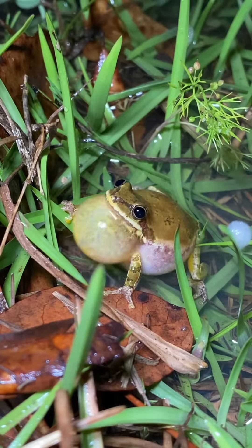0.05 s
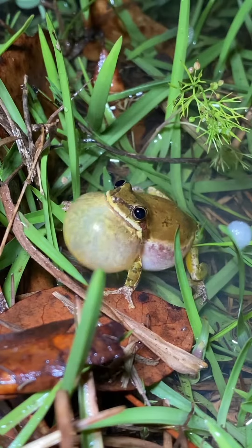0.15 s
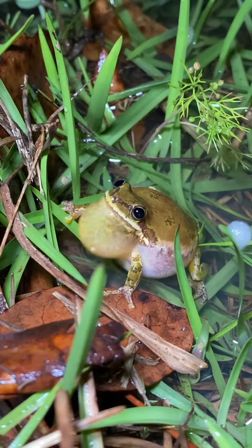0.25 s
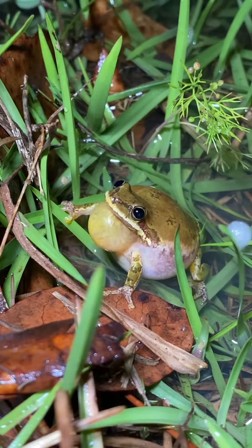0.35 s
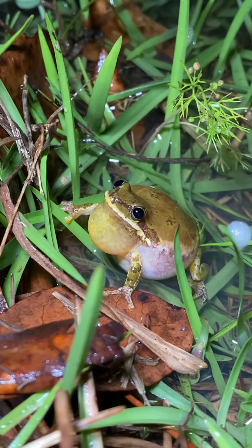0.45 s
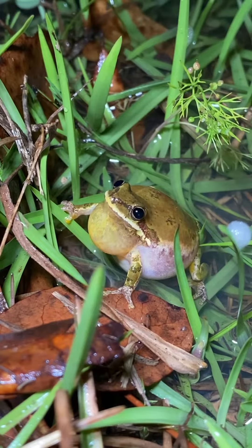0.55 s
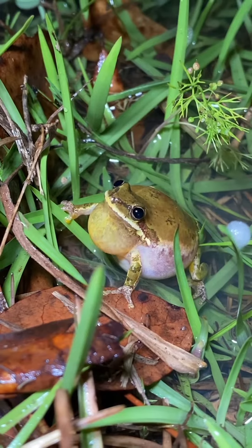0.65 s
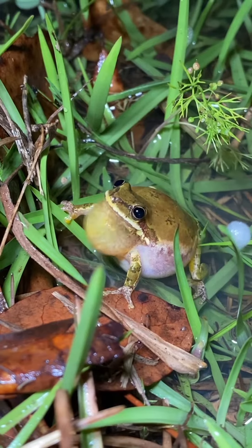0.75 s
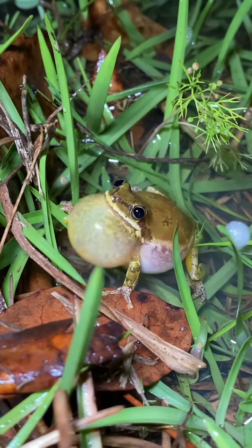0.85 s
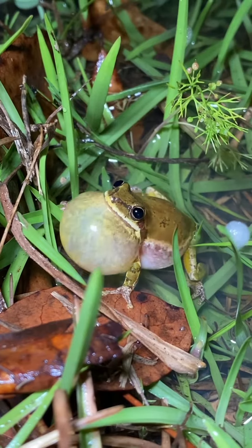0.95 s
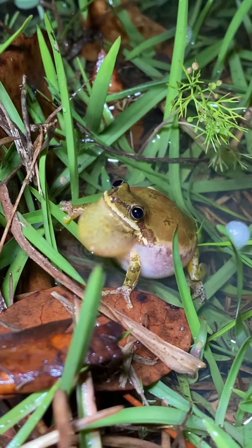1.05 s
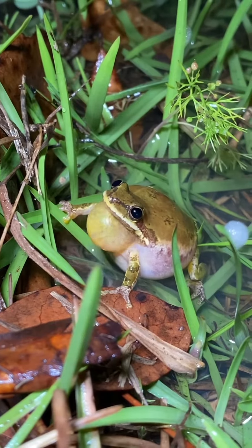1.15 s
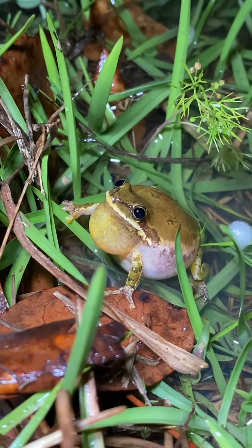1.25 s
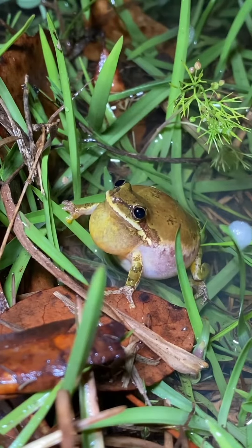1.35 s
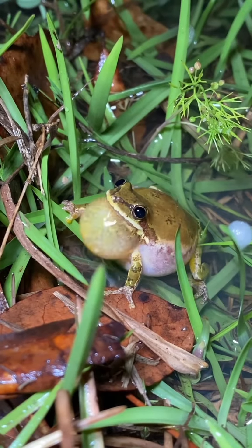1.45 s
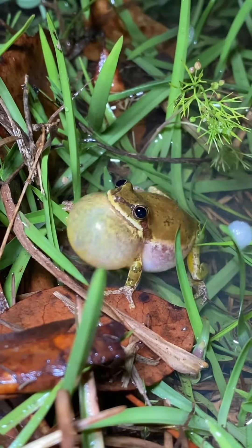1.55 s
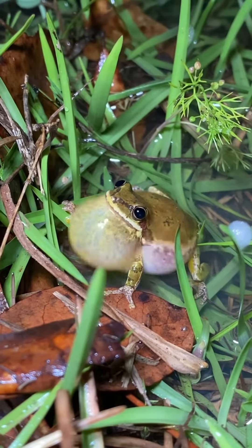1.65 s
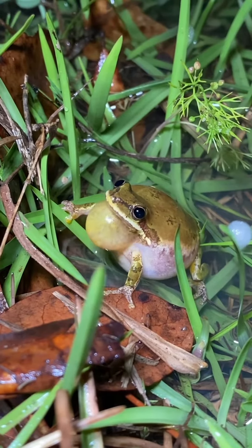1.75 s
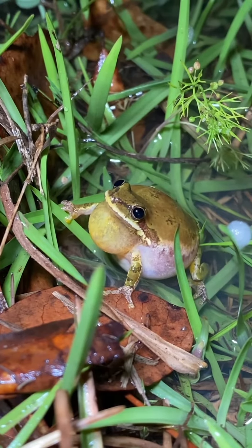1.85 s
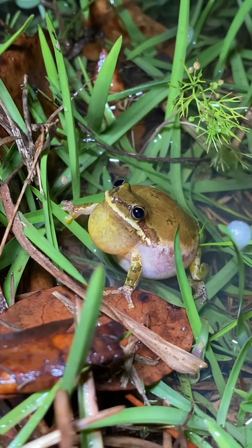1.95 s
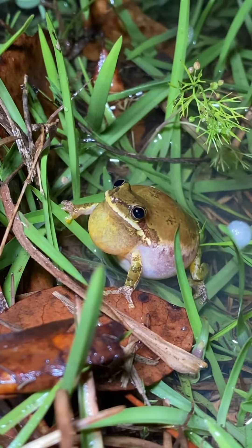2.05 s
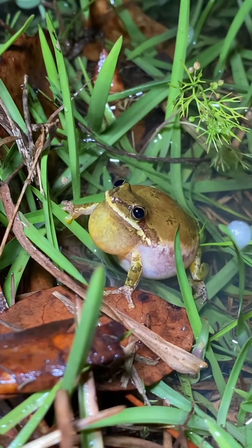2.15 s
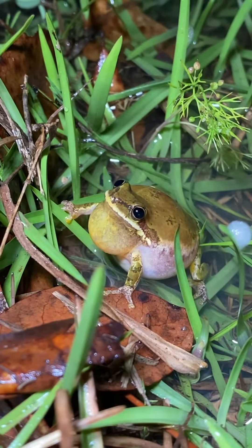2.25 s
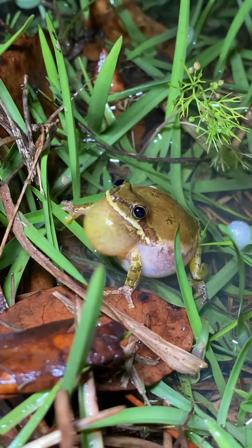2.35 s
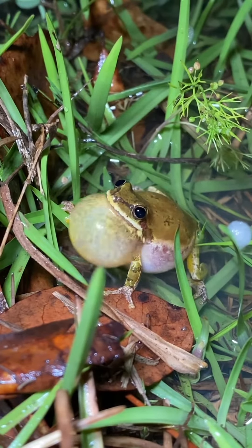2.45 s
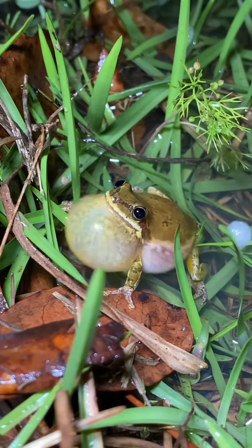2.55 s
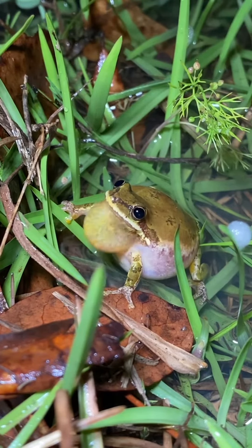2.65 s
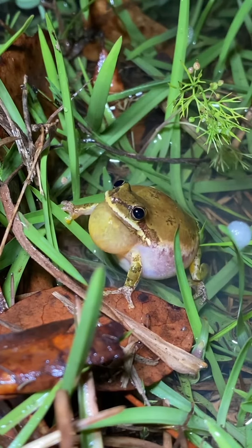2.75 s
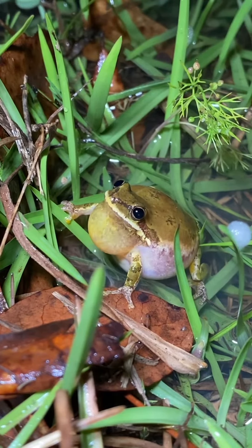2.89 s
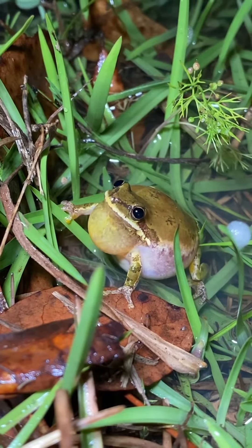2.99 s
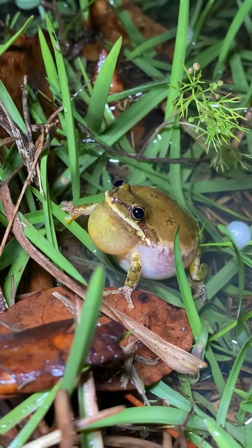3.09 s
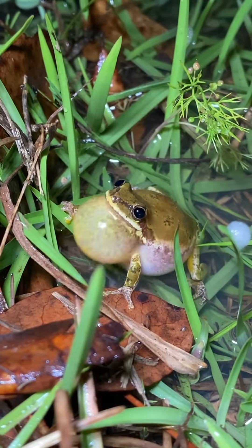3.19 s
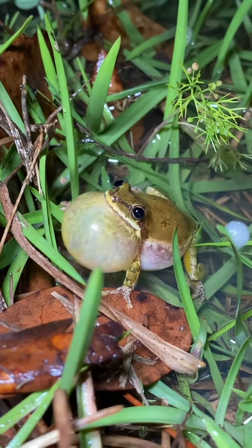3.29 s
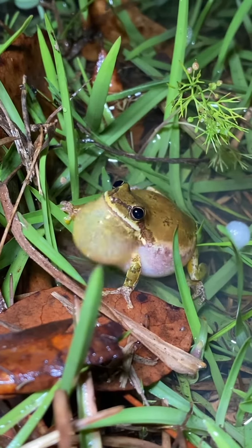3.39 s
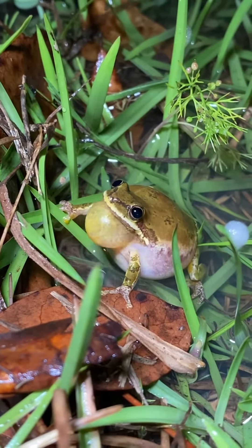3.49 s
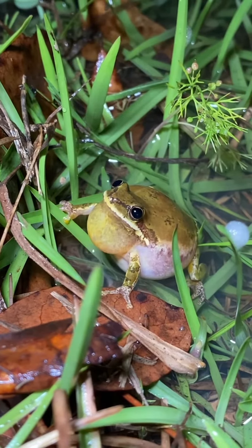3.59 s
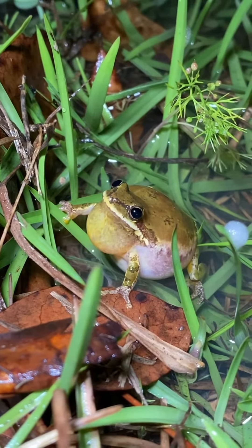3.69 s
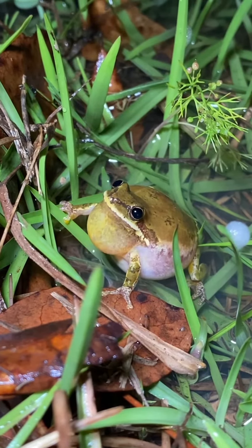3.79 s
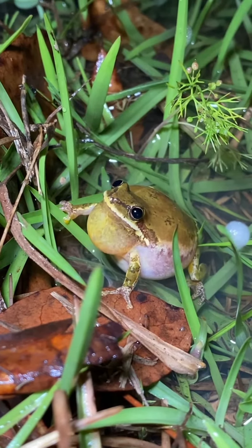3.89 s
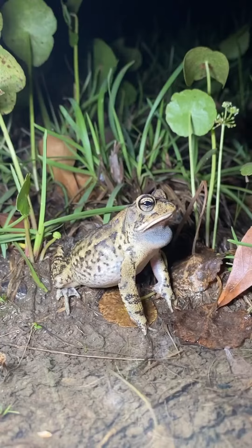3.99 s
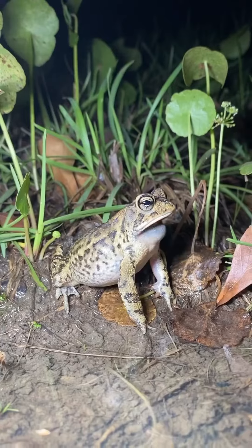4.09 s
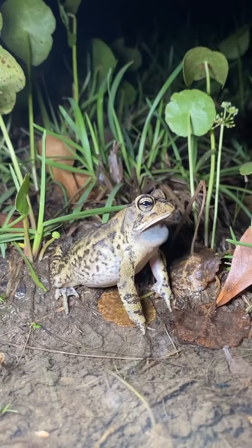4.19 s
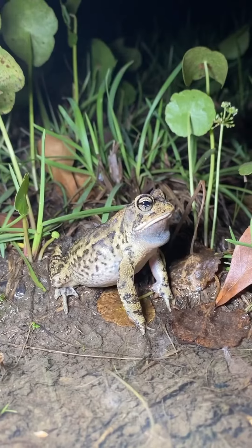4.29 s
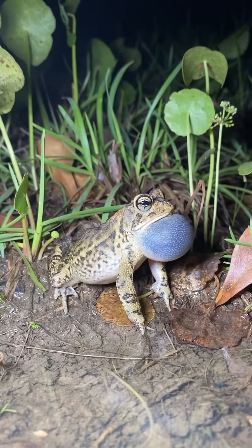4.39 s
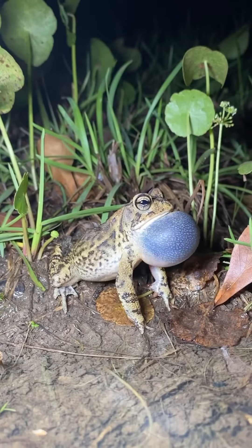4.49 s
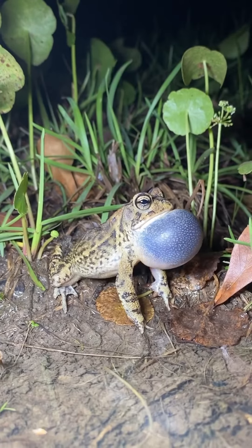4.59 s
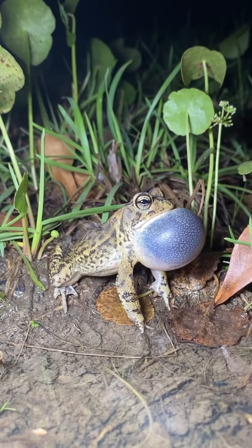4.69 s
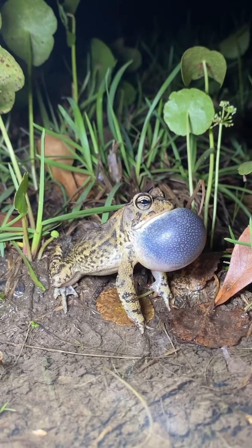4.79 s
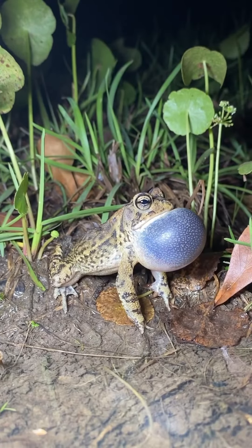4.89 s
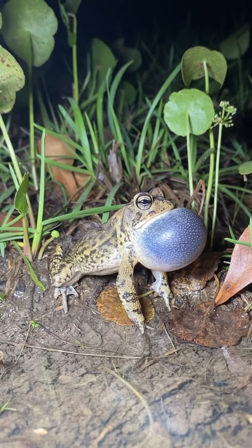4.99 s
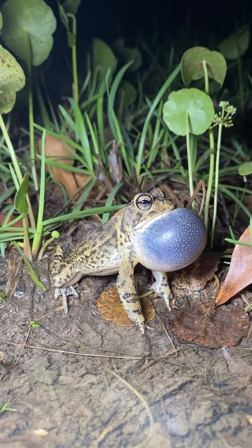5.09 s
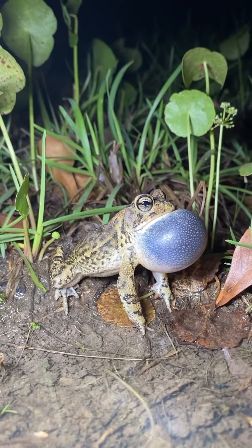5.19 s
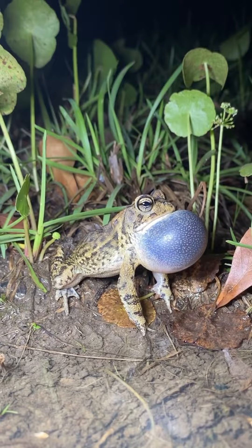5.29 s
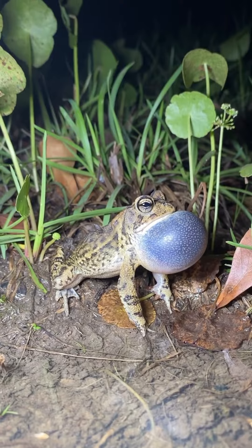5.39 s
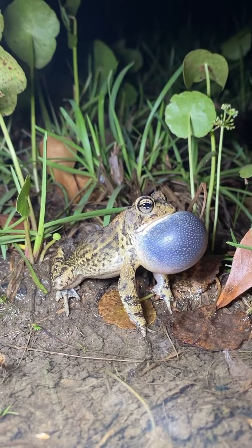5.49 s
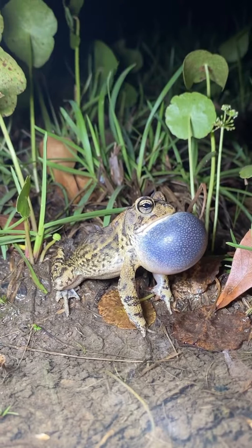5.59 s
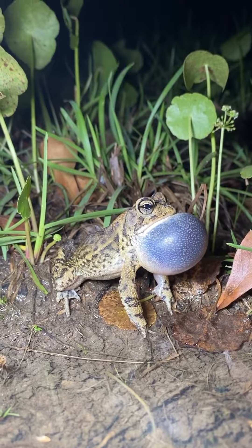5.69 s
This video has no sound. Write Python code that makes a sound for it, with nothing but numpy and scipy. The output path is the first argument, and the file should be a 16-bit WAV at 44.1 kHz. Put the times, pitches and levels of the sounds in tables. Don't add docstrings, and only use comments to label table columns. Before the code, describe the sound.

At a pond at night, a close tree frog gives brief grating croaks slightly under a second apart, over a pulsing chorus of distant frogs, a faint cricket and low hum. A knock marks a jump early on. Near four seconds another knock cuts to a much quieter bank, where a toad swells into a fast, clear trill until a final knock. Close stereo handheld microphone outdoors.

```python
import sys
import numpy as np
from scipy import signal
from scipy.fft import rfft, irfft, next_fast_len
from scipy.io import wavfile
from scipy.ndimage import uniform_filter1d

SR = 44100
rng = np.random.default_rng(int(sys.argv[2]) if len(sys.argv) > 2 else 0)


def store_wav(level_fs):
    pcm = np.round(np.clip(np.atleast_2d(level_fs), -1, 1) * 32767)
    wavfile.write(sys.argv[1], SR, pcm.T.astype(np.int16))


def voltage_ratio(decibels):
    exponent = np.asarray(decibels, float) / 20
    return 10 ** exponent


N = 253134
CUT_S = 3.976

# (slack [Hz], swollen [Hz], slack width [Hz], swollen width [Hz],
# slack level [dB], swollen level [dB])
THROAT_MODES = [(1046.9, 1125.8, 55, 220, -1.5, -3.5), (1415, 1550, 520, 480, -14, -9),
                (1723, 2204, 1400, 500, -7.5, -3.5), (2320, 3010.3, 500, 420, -6.5, 7),
                (3250, 3274, 1100, 500, -10.5, -11.5), (4533, 4600, 450, 500, -16.5, -25),
                (7100, 7100, 300, 300, -30, -25), (8860, 9300, 180, 230, -43.5, -31),
                (11100, 12000, 180, 170, -51, -43), (15300, 15300, 250, 250, -58.5, -47)]
MODE_LAG_MS = [0.62, 0.0185, -0.87, -0.0522, 0.462, -.1, -0.075, 0.6, -0.053, 0.83]
MODE_FLUTTER = [.05, .15, .15, .1, .2, .6, 1.5, 1.6, 2.4, 2.4]
# (start [s], pulses [count], gap before one late stray pulse [s])
FROG_CALLS = [
    (1.3555, 17, .028),
    (2.2848, 16, .0252),
    (3.0612, 17, .0139),
    (3.9142, 5, .1),
]
STRAY_DB = [-14, -28.5, -18, -50]
# (multiple of its pitch [ratio], level [dB])
STRAY_PARTIALS = [(1, -1.5), (1.95, -3), (3.05, -3)]


def frog():
    opening_gap_s, steady_gap_s, closing_gap_s = .0105, .00987, .0112
    full_effort_db, start_db, attack_s = -2, -10.5, 0.00951
    tire_db_per_s, tire_from_s = -39.5, 0.033
    swell_from_s, swell_s = 0.013, 0.077
    soft_tilt = 0.17
    stray_hz, stray_width_hz, stray_rise_s = 1012.7, 200, .009
    rise_s = .0038
    out, t = np.zeros((2, N)), np.arange(760) / SR
    end = np.cos(np.pi / 2 * t / t[-1]) ** .5
    modes = np.array(THROAT_MODES)
    slack, swollen = modes[:, ::2], modes[:, 1::2]
    for (start, pulses, stray_gap), stray_db in zip(FROG_CALLS, STRAY_DB):
        steady = [steady_gap_s] * max(pulses - 4, 2)
        since = np.cumsum([0, opening_gap_s, opening_gap_s] + steady + [closing_gap_s])
        effort_db = full_effort_db + start_db * np.exp(-(since / attack_s) ** 2)
        effort_db += tire_db_per_s * np.maximum(since - tire_from_s, 0)
        blip = 0
        for multiple, db in STRAY_PARTIALS:
            partial = ring(t, multiple * stray_hz, stray_width_hz, stray_rise_s, .15)
            blip = blip + voltage_ratio(stray_db + db) * partial
        add(out, start + since[-1] + stray_gap - stray_rise_s, end * blip)
        swelling = 1 - np.exp(-np.maximum(since - swell_from_s, 0) / swell_s)
        since += .00015 * rng.standard_normal(len(since))
        for at, effort, full in zip(start + since, effort_db, swelling):
            now = slack + full * (swollen - slack)
            duller = soft_tilt * (effort - full_effort_db)
            chance = rng.standard_normal((len(now), 2))
            for (hz, width, db), lag_ms, depth, (a, b) in zip(now, MODE_LAG_MS, MODE_FLUTTER, chance):
                level = voltage_ratio(effort + db + duller * np.log2(hz / 1000) + 0.23 * b - 4.0)
                mode = ring(t, hz * (1 + .01 * a), width, rise_s + lag_ms / 1000, depth)
                add(out, at - rise_s, level * end * mode)
    return out


# (multiple of the whistle [ratio], level [dB], flutter depth [ratio])
TOAD_OVERTONES = [(2, -37.5, 0.2), (2.85, -49, 1), (3.8, -43.5, 0.86), (4.6, -60.5, 0.79), (5.1, -55.5, .6),
                  (7.3, -65, 2)]
# (bend of the pitch arch [ratio], time to peak [ms], sharpness of close [-])
SLACK_PULSE = (2.3, 1.1, 0.524)
TAUT_PULSE = (1.108, 3.987, 2.061)


def toad():
    start_s, gap_s, stretch_s = 4.4232, .015744, 2.479e-5
    extra_gap_s, settle_pulses = .001886, 5.51
    out, t, k = np.zeros((2, N)), np.arange(1, 640) / SR, np.arange(79)
    times = gap_s * k + stretch_s * k ** 2 / 2
    times += extra_gap_s * settle_pulses * (1 - np.exp(-k / settle_pulses))
    end = np.cos(np.pi / 2 * (t / t[-1]) ** 3)
    opening = np.sin(np.clip(t / .0022, 0, 1) * np.pi / 2) ** 2
    for since, (a, b, c) in zip(times, rng.standard_normal((len(times), 3))):
        db = 1 - 19.5 * np.exp(-since / 0.0925) - 3.5 * max(since - 0.624, 0)
        hz = 2028.9 - 408 * np.exp(-since / 0.0989) - 150 * np.exp(-since / .02) + 54 * since
        taut = 1 / (1 + np.exp((0.11 - since) / 0.012))
        slack = 1 - taut
        bend, peak_ms, close = slack * np.array(SLACK_PULSE) + taut * np.array(TAUT_PULSE)
        u = t * 1000 / peak_ms
        shape = opening * np.exp(1.24 * (np.log(u) + (1 - u ** close) / close))
        settled = 1 - np.exp(-since / .5)
        arch = bend * (1 - 0.393 * settled) * ((t - .003) / .016) ** 2
        sag = np.minimum(arch + 12 * settled * (t - .004), .45)
        pitch = hz * (1 + .003 * a)
        phase = 2 * np.pi * np.cumsum(pitch * (1 - sag)) / SR
        overtones = 0
        for multiple, level_db, depth in TOAD_OVERTONES:
            unsteady = 1 + depth * smooth_noise(len(t), 70)
            lift_db = 10 * slack * (multiple < 2.5)
            overtones = overtones + voltage_ratio(level_db + lift_db) * unsteady * np.sin(multiple * phase)
        overtones *= np.sqrt(shape)
        air = smooth_noise(len(t), 50) * np.cos(.65 * phase)
        rattle = smooth_noise(len(t), 14)
        puff = voltage_ratio(-30.5) * air + (voltage_ratio(-34.5) + voltage_ratio(-21) * slack) * rattle
        tail = (0.32 + 0.8 * taut) * voltage_ratio(-26 + 5.7 * c) * ring(t, hz * 1.02, 48, 0.0061)
        whistle = shape * (np.sin(phase) + puff) + overtones + tail
        add(out, start_s + since - .001 + .0001 * c, voltage_ratio(db + .3 * b) * whistle * end)
    return out


# (start [s], end [s], mode at start [Hz], mode at end [Hz], level [dB])
NEIGHBOUR_CALLS = [(1.253, 1.4, 2917, 3200, -17), (1.54, 1.737, 2784, 2750, -20),
                   (1.639, 1.801, 3250, 3300, -24), (1.83, 1.992, 2886, 3150, -18.5),
                   (1.973, 2.132, 3146, 3300, -20), (2.116, 2.229, 2790, 3200, -30),
                   (2.243, 2.365, 2675, 2720, -20), (2.467, 2.618, 2839, 3189, -21),
                   (2.648, 2.773, 2911, 3300, -20.5), (2.693, 2.884, 3271, 3400, -22),
                   (3.227, 3.272, 2589, 3000, -22), (3.356, 3.497, 3230, 3311, -22.5),
                   (3.42, 3.628, 2714, 3100, -21), (3.591, 3.741, 3510, 3420, -28.5),
                   (3.746, 3.892, 2870, 3100, -32), (3.858, 3.945, 3005, 3300, -24.5),
                   (4.162, 4.335, 3250, 3400, -41), (4.357, 4.437, 2770, 2750, -44),
                   (3.996, 4.132, 3440, 3365, -60.5), (4.142, 4.334, 2587, 2650, -52.5)]
# (frequency [Hz], width [Hz], level [dB], flutter depth [ratio])
NEIGHBOUR_MODES = [(1269, 150, -15.5, 0.44), (1838, 440, -14.5, 0.22), (4361.6, 580, -18.5, 0.86)]
# (frequency [Hz], width [Hz], level [dB], flutter depth [ratio])
NEIGHBOUR_TOP = (10188, 176, -42, 7)


def neighbours():
    out, t = np.zeros((2, N)), np.arange(500) / SR
    top_hz, top_width, top_db, top_depth = NEIGHBOUR_TOP
    for start, end, hz0, hz1, db in NEIGHBOUR_CALLS:
        chance = rng.standard_normal((40, 8))
        gap_s = .0098 * (1 + .015 * chance[-1, 0])
        pan_db = 1.8 * chance[-1, 1]
        top = (top_hz, top_width, top_db + 0.027 * (hz0 - 3200), top_depth)
        for at, draw in zip(np.arange(start, end, gap_s), chance):
            along = (at - start) / (end - start)
            main = (hz0 + (hz1 - hz0) * along, 200, 0, .25)
            pulse = 0
            for (hz, width, mode_db, depth), r in zip([main, top] + NEIGHBOUR_MODES, draw):
                mode = ring(t, hz * (1 + 0.0025 * r), width, .0036, depth)
                pulse = pulse + voltage_ratio(mode_db + 0.4 * r) * mode
            call_db = db - 8.2 * (1 - along) ** 4 - 5.2 * along ** 6
            add(out, at - .0016 + .0002 * draw[-1], voltage_ratio(call_db) * pulse, pan_db)
    return out


def cricket():
    start_s, stroke_period_s = 1.2755, .02606
    out, t = np.zeros((2, N)), np.arange(640) / SR
    times = np.arange(start_s, CUT_S, stroke_period_s)
    shape = np.sin(np.pi * (t / t[-1]) ** 0.93) ** 1.5
    for at, (a, b) in zip(times, rng.standard_normal((len(times), 2))):
        hz = 5920 * (1 + 0.0027 * a) - 700 * (t / t[-1]) ** 2.7
        chirp = shape * np.sin(2 * np.pi * np.cumsum(hz) / SR)
        add(out, at, voltage_ratio(-40.0 + 0.74 * b) * chirp, .5)
    return out


# (time [s], level [dB], frequency [Hz], decay [ms], tick level [dB])
CLICKS = [
    (1.2676, -8.5, 984, 1.61, -36),
    (1.2716, -41, 995, 1.73, -34),
    (3.9524, -16.5, 1560, 0.54, -16),
    (4.278, -52, 712, 3, -76.5),
    (5.7393, -17, 2000, 0.63, -20),
]


def clicks():
    out, t = np.zeros((2, N)), np.arange(800) / SR
    for at, db, hz, decay_ms, tick_db in CLICKS:
        damped = voltage_ratio(db) * np.exp(-t * 1000 / decay_ms) * np.cos(2 * np.pi * hz * t)
        tick = voltage_ratio(tick_db) * np.exp(-t / 0.000091) * rng.standard_normal(len(t))
        add(out, at, damped + tick)
    return out


# (frequency [Hz], level per Hz [dB])
POND_SPECTRUM = [(20, -42), (40, -25.5), (75, -8.5), (110, -20), (200, -30), (500, -33.5), (850, -27.5),
                 (1180, -4.5), (1700, -30.5), (2900, -5), (3400, -9), (4000, -29), (6000, -21.5),
                 (7200, -53), (9500, -34.5), (12000, -74.5)]


def pond_murmur():
    return wash(POND_SPECTRUM, -42.5 + 5.5, 0.73)


# (frequency [Hz], level per Hz [dB])
BANK_SPECTRUM = [(20, -30.5), (60, -16.5), (160, -19), (250, -29), (800, -45.5), (1250, -21), (1900, -42.5),
                 (2500, -27), (3400, -22), (4200, -46.5), (8000, -78)]


def bank_murmur():
    return wash(BANK_SPECTRUM, -65 + 7.0, 1.6)


# (frequency [Hz], level [dB])
MACHINERY = [(118.4, -76.5), (177.6, -74)]


def machinery():
    t = np.arange(N) / SR
    return sum(voltage_ratio(db + 5) * np.sin(2 * np.pi * hz * t) for hz, db in MACHINERY)


# (frequency [Hz], left-right correlation [-1 to 1])
DIFFUSE_LIKENESS = [(50, 1), (200, 0.862), (500, 0.45), (1200, 0.28), (3000, 0.95), (9000, 0.51)]


def wash(spectrum, db, patchy_db):
    hz = np.fft.rfftfreq(1024, 1 / SR)
    a, b, c, d, patches = rng.standard_normal((N // 256 + 5, 513, 5)).T
    patches = evened(uniform_filter1d(uniform_filter1d(patches, 8, 0), 14, 1))
    same = np.clip(read(DIFFUSE_LIKENESS, hz), -1, 1)[:, None]
    left = a + 1j * b
    right = same * left + np.sqrt(1 - same ** 2) * (c + 1j * d)
    z = np.array([left, right]) * voltage_ratio(read(spectrum, hz)[:, None] + patchy_db * patches)
    return voltage_ratio(db) * evened(signal.istft(z, nperseg=1024, noverlap=768)[1][:, :N])


def echoes(x, db, t60):
    t = np.arange(6000) / SR
    tail = rng.standard_normal((2, len(t))) * voltage_ratio(-60 * t / t60) * (t > .002)
    tail /= np.linalg.norm(tail[0])
    return x + voltage_ratio(db) * signal.fftconvolve(x, tail, axes=1)[:, :N]


def ducking(x, knee_db, share, db_per_s):
    power_db = 10 * np.log10(abs(uniform_filter1d((x ** 2).mean(0), 900)) + 1e-12)
    fall_db = np.arange(N) * db_per_s / SR
    held_db = np.maximum.accumulate(power_db + fall_db) - fall_db
    over_db = np.maximum(held_db - knee_db, 0)
    return voltage_ratio(-share * uniform_filter1d(over_db, 400))


def ports(x, phase, lean):
    size = next_fast_len(N)
    hz = np.fft.rfftfreq(size, 1 / SR)
    half = voltage_ratio(read(lean, hz) / 2) * np.exp(.5j * read(phase, hz))
    return irfft(rfft(x, size) * np.array([half, 1 / half]), size)[:, :N]


def coloured(x, points):
    size = next_fast_len(N)
    gain = voltage_ratio(read(points, np.fft.rfftfreq(size, 1 / SR)))
    return irfft(rfft(x, size) * gain, size)[:, :N]


def ring(t, hz, width, rise, depth=0.):
    swell = np.sin(np.clip(t / rise, 0, 1) * np.pi / 2) ** 4.664
    decay = np.exp(-np.pi * width * np.maximum(t - rise, 0))
    flutter = 1 + depth * smooth_noise(len(t), 60)
    return swell * decay * flutter * np.cos(2 * np.pi * hz * (t - rise))


def smooth_noise(length, span):
    return evened(np.convolve(rng.standard_normal(length), np.hanning(span), "same"))


def evened(x):
    return x / np.sqrt(np.mean(x ** 2) + 1e-20)


def read(points, hz):
    f, value = np.transpose(points)
    return np.interp(np.log(hz + 1), np.log(f + 1), value)


def add(mix, at_s, sound, pan_db=0.):
    part = mix[:, round(at_s * SR):][:, :len(sound)]
    part += sound[:part.shape[1]] * voltage_ratio([[pan_db / 2], [-pan_db / 2]])


# (frequency [Hz], left minus right [dB])
FROG_PHASE = [(0, 0), (690, -0.1), (1380, 0.1), (1640, -0.3), (2500, 0.8), (3100, 0.3)]
FROG_LEAN = [(100, 0), (550, -3), (960, -3), (1680, 1), (2920, 0.5)]
# (frequency [Hz], left minus right [dB])
TOAD_PHASE = [(0, 0), (1460, 0.42), (2070, -0.656), (2580, -0.78), (2840, 0.49), (3100, -1.6)]
TOAD_LEAN = [(60, 0.0), (130, 0.0), (280, 0.0), (620, 0.0), (1340, 0.745), (2920, -0.5)]
TRILL_STEPS_AT = [4.603, 4.667, 4.812]
# (frequency [Hz], level [dB])
MICROPHONE = [(6000, -2.5), (6500, -25.5), (8100, -20), (8600, -5), (11700, -4.5), (12400, -31),
              (14300, -24.5), (15300, -1.5)]


def scene():
    t = np.arange(N) / SR
    # (frequency [Hz], level [dB])
    small_body = [(150, -46.5), (300, -27), (600, -5), (780, 3), (950, 3.0)]
    near = ports(coloured(frog(), small_body), FROG_PHASE, FROG_LEAN)
    far = echoes(coloured(neighbours(), small_body), -5, .1)
    pond = pond_murmur() + far + echoes(cricket(), -8, .05)
    pond *= ducking(near, -28, .5, 70)
    near = echoes(near, -6.5, 0.031) * (t < 3.9545)
    pond += 1.6 * np.tanh(near / 1.6)
    start, length = round(2.352 * SR), round(1.2665 * SR)
    pond[:, :length] = pond[:, start:start + length].copy()

    toad_body = [(250, -22), (500, -11.5), (850, -11), (1100, 0)]
    trill = ports(coloured(toad(), toad_body), TOAD_PHASE, TOAD_LEAN)
    trill *= voltage_ratio(-2 * np.searchsorted(TRILL_STEPS_AT, t))
    distant = coloured(far * (t > CUT_S), [(3700, -1), (4200, -25)])
    bank = bank_murmur() + distant + echoes(trill, -29.5, 0.084) + machinery()
    fade = np.clip((t - CUT_S) / 0.0017, 0, 1)
    return coloured(pond * (1 - fade) + bank * fade, MICROPHONE) + clicks()


def low_pass(x):
    return signal.sosfilt(signal.butter(12, 16450, fs=SR, output="sos"), x)


def record(dry):
    return low_pass(dry)


dry = scene()
out = record(dry)
store_wav(out)
```